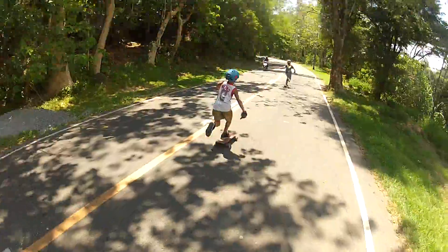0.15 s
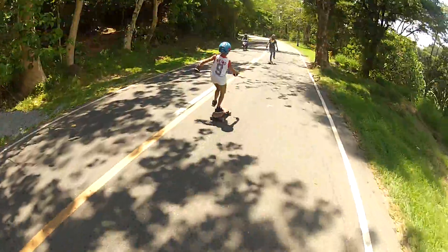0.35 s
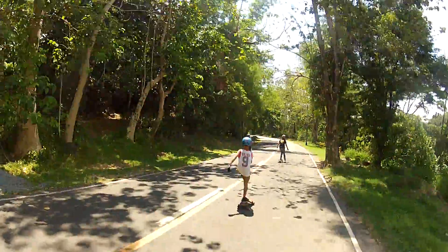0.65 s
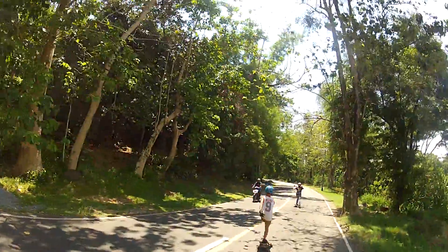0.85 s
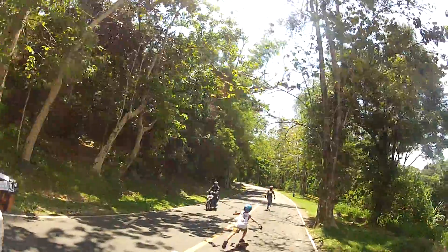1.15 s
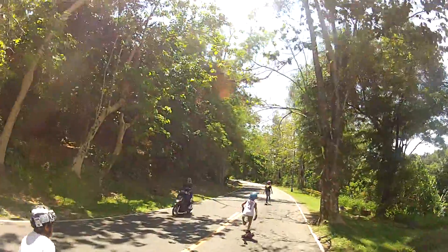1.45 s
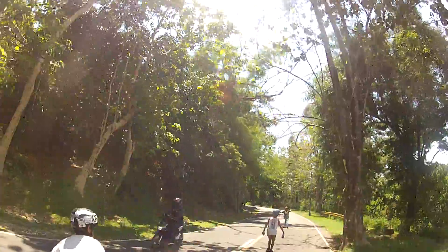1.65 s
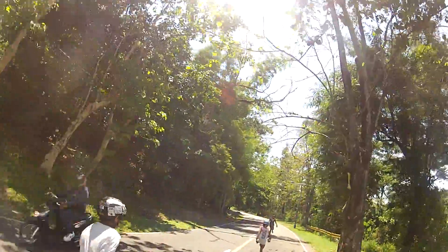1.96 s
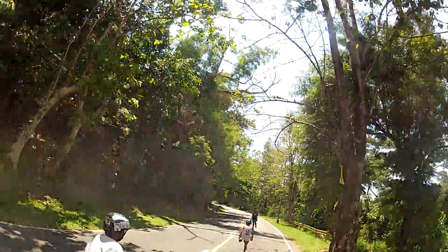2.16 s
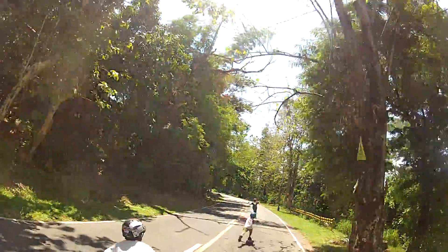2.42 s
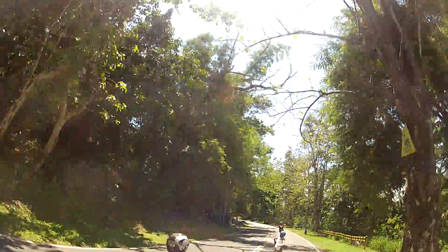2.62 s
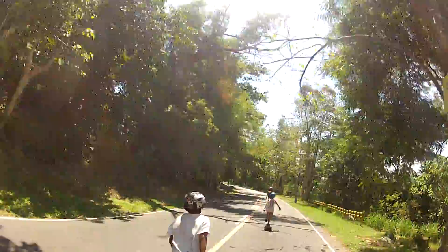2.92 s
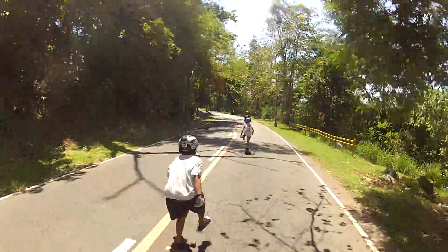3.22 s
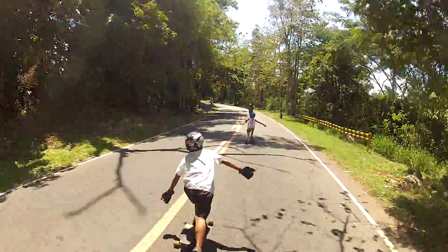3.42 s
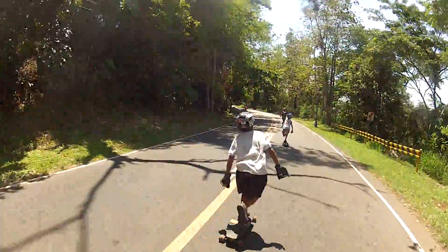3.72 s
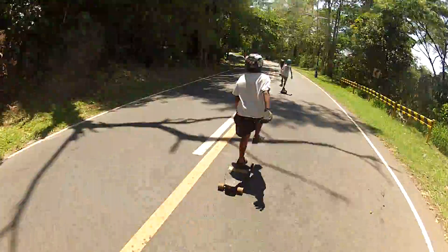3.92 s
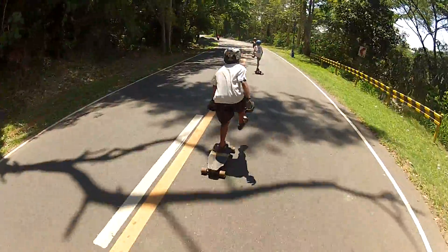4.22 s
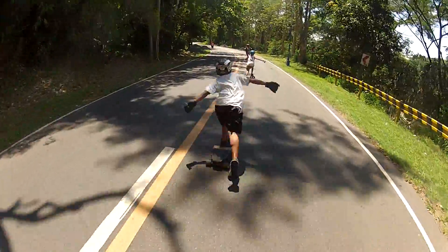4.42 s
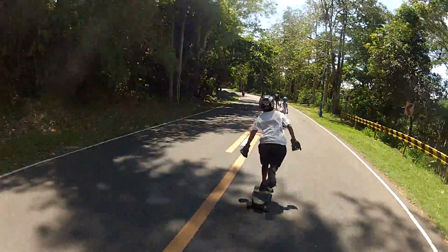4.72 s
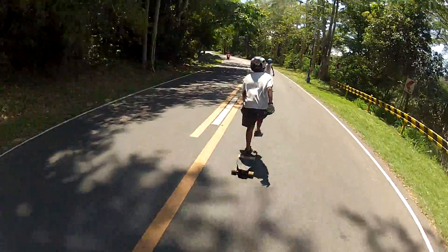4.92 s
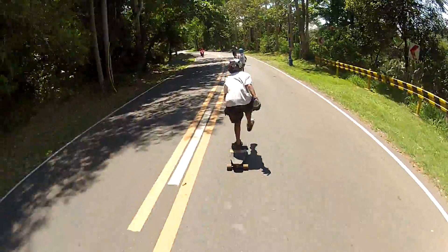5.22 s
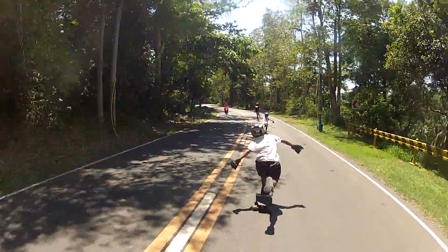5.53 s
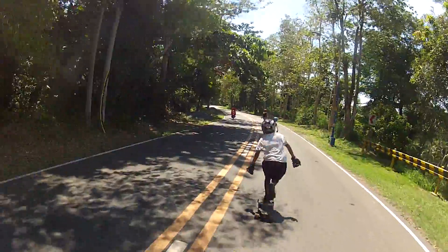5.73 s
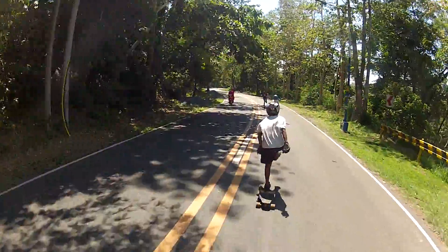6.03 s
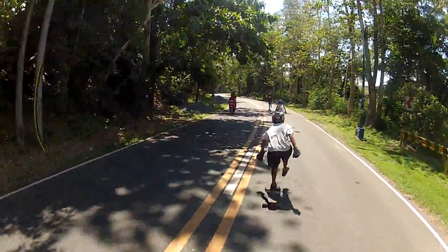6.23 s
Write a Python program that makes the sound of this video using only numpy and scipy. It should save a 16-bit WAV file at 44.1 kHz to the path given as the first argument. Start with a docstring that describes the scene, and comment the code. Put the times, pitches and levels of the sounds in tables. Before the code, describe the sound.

Longboard wheels grind and ring over coarse asphalt, heard from an action camera in a plastic case carried by a rider. Small clacks and ticks pepper the rolling. A hard knock comes early, a motorcycle hisses past, and a wheel squeals briefly. The rolling grows stronger, then two more heavy knocks and low wind gusts lead to another engine's thrum.

```python
"""Wheels grinding over rough asphalt come first, with small plastic clacks: longboards roll down a forest road.
We listen from an action camera in a plastic case, carried by one rider. Random stone hits ring the wheels and deck,
wind noise presses on the case, and bumps make the case and its mount rattle and knock.
A motorcycle hisses past after two seconds, a wheel squeals briefly, and another engine thrums up near the end.
The camera then turns overloads down, rounds off peaks and adds mirrored treble."""
import sys
import numpy as np
from scipy import signal
from scipy.fft import rfft, irfft
from scipy.io import wavfile
from scipy.ndimage import uniform_filter1d

SR = 44100
rng = np.random.default_rng(int(sys.argv[2]) if len(sys.argv) > 2 else 0)


def master_out(mix):
    """Clip the mix to full scale and print it as 16-bit PCM to the path in sys.argv[1]."""
    frames = np.transpose(np.atleast_2d(mix))
    ceiling = np.clip(frames, -1, 1)
    pcm = np.round(ceiling * 32767).astype(np.int16)
    wavfile.write(sys.argv[1], SR, pcm)


N = 280917

# The ride; its height above CRUISE_DB is the swell of the rolling noise: (time [s], level [dB])
RIDE = [(0.12, -57), (0.22, -59), (1.13, -55.5), (1.6, -51), (2.09, -54), (2.35, -47), (2.52, -47.5),
        (2.89, -51), (3.38, -48.5), (3.81, -48), (4.07, -53), (4.37, -50.5), (4.56, -47.5), (4.79, -48),
        (5.31, -50.5), (5.6, -44.5), (6.09, -48), (6.37, -46)]
CRUISE_DB = -50
# Layer levels when the swell is zero, before their flutter
WHEEL_DB, RUMBLE_DB, HISS_DB = -49.5, -50.5, -62
# Share of the swell that rumble and hiss follow; the rumble also grows as the board gathers speed
RUMBLE_FOLLOWS, HISS_FOLLOWS, RUMBLE_DB_PER_S = 0.229, 0.14, 1.0711
# Resonances of wheels and deck: (pitch [Hz], width [Hz], relative level [dB])
WHEEL_MODES = [(1163.2, 47.5, 0.5), (1712, 87.5, -1), (1903, 114, -10), (2343.4, 32, 0)]
# Tone outlines of the wheel grind, the low rumble and the contact hiss: (frequency [Hz], relative level [dB])
ROLL_TONE = [(450, -0.5), (520, -7), (620, -2.5), (880, -5.5), (1020, -4), (1150, 4.5), (1300, 3.5),
             (1500, -5.5), (1900, 6), (2130, 0), (2350, 7), (2600, -6), (2900, -11.5), (3400, -11)]
RUMBLE_TONE = [(29, -47.5), (50, -1), (72, 2.5), (103, -7.5), (134, -3), (167, -8.5), (257, -8.5),
               (316, -16.5), (578, -16), (800, -29), (1040, -63.5), (1760, -120)]
HISS_TONE = [(1500, -5.5), (2500, 12.5), (3300, 5), (4200, -2), (5000, 0), (5800, -10.5)]

# Wheels singing under a sideways push:
# (start time [s], end time [s], start pitch [Hz], end pitch [Hz], level at the middle [dB])
SINGS = [(0.072, 0.463, 506, 530, -65), (0.478, 0.893, 553, 532.8, -59), (0.886, 1.45, 513, 540, -64.5),
         (2.002, 2.27, 2300, 2367, -53), (3.182, 3.401, 1160, 1100, -54), (3.598, 3.8, 1177, 1130, -57.5),
         (6.151, 6.379, 1206, 1150, -53.5)]
# Squeal of a drifting wheel; only overtones of the base pitch sound: (time [s], base pitch [Hz], level [dB])
SQUEAL = [(2.70, 424, -103), (2.72, 428.7, -41), (2.76, 433.1, -49), (2.80, 448.2, -48), (2.86, 458.6, -55),
          (3.0, 468.5, -62), (3.12, 465.7, -63), (3.25, 466, -82.5)]
# Resonances of the squealing wheel: (pitch [Hz], half width [Hz], relative level [dB])
SQUEAL_MODES = [(2583, 48, -1.5), (3290, 293, -1.5)]

# Hard knocks of the mount: (time [s], level [dB], brightness [dB per octave], chatter length [s],
# thump relative to level [dB], lingering ring relative to level [dB])
KNOCKS = [(1.7223, -2.5, -5, 0.00235, -12.5, -32), (5.1258, 2, -7.5, 0.0035, -8, -40.5),
          (5.655, -0.5, -4.5, 0.00332, -8.5, -27)]
# Resonances of the plastic case, before each knock's brightness: (pitch [Hz], width [Hz], relative level [dB])
CASE_MODES = [(660, 245, -23.5), (1088.5, 121, -1.5), (1269, 98, -7), (1609, 67, -11), (1656, 260, 3.5),
              (1977.3, 121.6, 7), (2521, 127.6, -1), (2784, 320, -7), (3137, 123, -13.5), (4630, 300, -30),
              (5060, 336, -22.5)]
# Bumps that rattle the case; all thuds get a shared boost on top of their weight:
# (time [s], clack level [dB], thud weight relative to clack [dB], tick relative to clack [dB])
RATTLES = [(0.032, -44, -14, -29), (.065, -45.5, -19, -24.5), (.082, -48.5, 1, -17),
           (0.5001, -43, -10.5, -8), (0.5304, -39, 3, -12.5), (0.5927, -42, -6.5, -11.5),
           (0.7152, -43.5, -1.5, -13), (.963, -49, -12, -19), (1.1194, -29.5, -18.5, -9),
           (1.212, -42.5, -18, -13.5), (1.3123, -40.5, 1.5, -17), (1.4535, -41.5, -17, -6.5),
           (1.555, -39, 3.5, -18.5), (1.653, -31, -0.5, -10.5), (2.3862, -32.5, -15.5, -4.5),
           (2.411, -38, -22, -12.5), (3.1818, -40, 3, -13), (3.391, -31, -13.5, -15),
           (3.437, -38, -5, -0.5), (3.61, -38, 10.5, -18.5), (4.138, -50.5, 14.5, -23.5),
           (4.393, -28, -23.5, -17.5), (4.456, -42.5, 2, -4.5), (4.62, -45, 5, -9.5), (4.655, -47.5, 4, 3),
           (4.781, -40.5, -5.5, -13.5), (5.071, -42, 3.5, -12.5), (5.1061, -25.5, -2, -15.5),
           (5.378, -36, 7, -15), (5.3874, -39, 7.5, -0.5), (5.411, -49, 13, -5), (5.4848, -38, -0.5, -11)]
# Light ticks of a loose fitting: (time [s], level [dB])
TICKS = [(0.1123, -46), (0.261, -56), (0.6952, -50), (0.865, -51.5), (.9196, -57.5), (1.579, -47.5),
         (1.6932, -45), (2.5495, -50), (2.6212, -49), (2.6486, -51.5), (3.7109, -44), (4.8296, -49.5),
         (5.5799, -45.5), (5.6305, -42.5), (5.704, -41.5), (5.7983, -43)]
# Faint extra ticks of the fitting at random times: how many, middle level, spread either way
CHATTER_PER_S, CHATTER_DB, CHATTER_SPREAD_DB = 5.8, -61, 2
# Tone outlines of thud, clack (before its pitch is scaled) and tick: (frequency [Hz], relative level [dB])
THUD_TONE = [(50, -6.5), (110, -0.5), (270, 3), (420, -10.5), (750, -18.5), (1600, -13)]
CLACK_TONE = [(400, -23.5), (850, -24.5), (1180, -3), (1500, -10.5), (1900, 2), (2350, 3.5), (2900, -8.5),
              (3800, -52)]
TICK_TONE = [(2200, -41), (3000, 4), (3600, 11.5), (4300, 1), (5100, 6), (5800, -6.5)]
# Time for each scrape to die away by 60 dB
THUD_T60_S, CLACK_T60_S, TICK_T60_S = 0.0596, 0.0323, 0.0281
# Lighter bumps ring higher: pitch factor at a weight of 0 dB, and its rise for each dB less
CLACK_PITCH, CLACK_OCTAVES_PER_DB = 0.9735, 0.0158
# Jolts that set the mount swaying: (time [s], starting strength [dB])
JOLTS = [(0.529, -34), (1.659, -29), (1.722, -16), (4.648, -26), (5.11, -12.5), (5.152, -16.5),
         (5.362, -17), (5.393, -18.5), (5.663, -11.5), (5.731, -19)]
SWAY_T60_S = 0.1887

# Passing motorcycle: when it is nearest, how long it takes to come and to go, its tyre level there
PASS_S, APPROACH_S, RECEDE_S, TYRE_DB = 2.42, 0.264, 0.38, -49.5
# Its engine level and firing rate when nearest, and the steady fall in rate (Doppler)
BIKE_DB, BIKE_HZ, BIKE_FALL_HZ_PER_S = -54, 43.04, 4.1
# Oncoming motorcycle: (time [s], firing rate [Hz], level [dB])
ONCOMING_BIKE = [(5.3, 35.48, -53.5), (5.7, 35.74, -44.5), (6.0, 35.94, -45.5), (6.2, 35.9, -43),
                 (6.37, 35.73, -43.5)]
# Silencer resonances: (pitch [Hz], width [Hz], relative level [dB])
SILENCER = [(70, 19, -18), (159.5, 54, 0), (384, 40, -32)]

# Steady buffeting, its growth with speed, and the rise and fall times that all gusts share
BREEZE_DB, BREEZE_DB_PER_S, GUST_RISE_S, GUST_FALL_S = -58.5, 0.56, 0.0468, 0.0303
# Gusts added to the steady buffeting: (time [s], peak level [dB])
GUSTS = [(.11, -49), (.74, -38.5), (2.63, -46.5), (2.73, -37.5), (3.93, -46.5), (4.58, -40), (4.69, -36.5),
         (5.0, -44), (5.38, -38.5), (5.54, -31), (5.67, -32.5)]
# Tone outline of the wind on the case: (frequency [Hz], relative level [dB])
BUFFET_TONE = [(12, -30), (25, 5), (45, -3.5), (65, -1), (90, -22.5), (150, -40.5), (400, -27.5)]

# Camera gain control: overload threshold, share of the excess taken off, recovery, attack
CEILING_DB, DUCK_SHARE, RECOVER_DB_PER_S, DUCK_ATTACK_S = -3.5, 0.79, 95, 0.00665
# Camera treble: rate of the held steps, top of the plain sound, top of the mirrored sound
HOLD_HZ, BAND_HZ, TOP_HZ = 12000, 5900, 15500


def undb(db):
    """Turn decibels into a plain gain."""
    return 10 ** (np.asarray(db) / 20)


def unit(x):
    """Scale to an average strength (rms) of one."""
    return x / np.sqrt(np.mean(x ** 2) + 1e-20)


def curves(table):
    """Join the points of a table by straight lines, one curve for each column after the time."""
    s, *columns = np.transpose(table)
    return [np.interp(np.arange(N) / SR, s, c) for c in columns]


def add(out, s, x):
    """Mix a short sound in at time s."""
    i = max(int(s * SR), 0)
    out[i:i + len(x)] += x[:max(N - i, 0)]


def colour(x, points, size=4096):
    """Filter to a tone outline with steep skirts; the filter never answers before its input."""
    hz, db = np.transpose(points)
    octave = np.log2(np.maximum(np.arange(size // 2 + 1) * SR / size, 2))
    below = np.maximum(np.log2(hz[0]) - octave, 0)
    above = np.maximum(octave - np.log2(hz[-1]), 0)
    skirt_db = np.minimum(24 * (below + above), 60)
    gain = undb(np.interp(octave, np.log2(hz), db) - skirt_db)
    # folding the cepstrum gives the minimum-phase filter with this gain
    cepstrum = irfft(np.log(gain))
    cepstrum[1:size // 2] *= 2
    cepstrum[size // 2 + 1:] = 0
    response = irfft(np.exp(rfft(cepstrum)))
    return signal.fftconvolve(x, response)[:len(x)]


def resonate(x, hz, width_hz):
    """Ring one resonance, with a gain of one at its centre."""
    return signal.lfilter(*signal.iirpeak(hz, hz / width_hz, fs=SR), x)


def walk(rate):
    """Wander smoothly at random, with a spread near one."""
    k = max(int(SR / rate), 1)
    steps = rng.standard_normal(2048)[np.arange(N) // k % 2048]
    smooth = uniform_filter1d(uniform_filter1d(steps, k), k)
    return 1.3 * smooth


def burst(t, t60, points, blow=0):
    """A short scrape, with a sharp blow if wanted, coloured by what it shakes."""
    envelope = (1 - np.exp(-t / .0007)) * undb(-60 * t / max(t60, .003))
    scrape = rng.standard_normal(len(t)) * envelope
    contact = blow * signal.unit_impulse(len(t)) + scrape / np.linalg.norm(scrape)
    x = colour(contact, points)
    # same energy as 10 ms at an rms of one
    return x / np.sqrt(np.sum(x ** 2) / (.01 * SR))


def rolling():
    """The road grain rings wheels and deck, rumbles up through the rider and hisses where the tyres touch."""
    swell_db = curves(RIDE)[0] - CRUISE_DB
    rumble_db = RUMBLE_DB + RUMBLE_FOLLOWS * swell_db + RUMBLE_DB_PER_S * np.arange(N) / SR

    grind = unit(colour(grit(rate=4000, spread_db=2.0), ROLL_TONE))
    flutter_db = 1.15 * walk(28)
    wheels = (grind + undb(-7.0) * wheel_rings()) * undb(WHEEL_DB + swell_db + flutter_db)

    rumble = unit(colour(grit(rate=3300, spread_db=2.0), RUMBLE_TONE))
    rumble = rumble * undb(rumble_db + 0.17 * walk(22))

    # the motorcycle's tyres radiate sideways, so they fade faster than its engine
    bike_tyres = undb(TYRE_DB) * nearness() ** 2
    hiss_gain = np.hypot(undb(HISS_DB + HISS_FOLLOWS * swell_db), bike_tyres)
    hiss = unit(colour(grit(rate=9800, spread_db=3.0), HISS_TONE)) * hiss_gain * undb(.5 * walk(35))
    return wheels + rumble + road_echo(hiss, share=0.3)


def grit(rate, spread_db):
    """Asphalt stones meet the wheels: dense random hits (rate per second), a few much harder than the rest."""
    hits = rng.random(N) < rate / SR
    hardness_db = spread_db * np.minimum(rng.exponential(size=N), 5)
    return unit(hits * rng.standard_normal(N) * undb(hardness_db))


def wheel_rings():
    """Each resonance of wheels and deck swells and fades as the weight shifts."""
    out = 0
    for hz, width, db in WHEEL_MODES:
        stones = grit(rate=5000, spread_db=3)
        out = out + undb(db + 1.38 * walk(3.2)) * resonate(stones, hz, width)
    return unit(out)


def road_echo(x, share):
    """Hiss also arrives off the road around the pass; its shrinking delay sweeps a row of notches through it."""
    i = np.arange(N)
    lag_s = np.interp(i / SR, [2.0, 2.7], [.00173, .00158])
    depth = share * np.exp(-((i / SR - 2.3) / 0.7) ** 2)
    echo = np.interp(i - lag_s * SR, i, x)
    return (x + depth * echo) / np.sqrt(1 + depth ** 2)


def singing():
    """A wheel pushed sideways rings at one narrow, drifting, uneven pitch."""
    out, t = 0, np.arange(N) / SR
    for start, end, start_hz, end_hz, db in SINGS:
        progress = np.clip((t - start) / (end - start), 0, 1)
        phase = 2 * np.pi * np.cumsum(start_hz + (end_hz - start_hz) * progress) / SR
        ring = (0.125 + .5 * walk(70)) * np.sin(phase) + .5 * walk(70) * np.cos(phase)
        fade = np.sqrt(4 * progress * (1 - progress))
        out = out + unit(ring) * undb(db) * fade
    return out


def squeal(rough):
    """Urethane sticks and slips unevenly; overtones near the wheel's resonances stand out."""
    hz, db = curves(SQUEAL)
    phase = 2 * np.pi * np.cumsum(hz) / SR
    tone = 0
    for k in np.arange(6, 11):
        gain = 0
        for mode_hz, half_width, mode_db in SQUEAL_MODES:
            gain = gain + undb(mode_db) / np.hypot(1, (k * hz - mode_hz) / half_width)
        tone = tone + gain * np.sin(k * phase + rough * walk(190)) * undb(2 * walk(50))
    return unit(tone) * undb(db)


def knocks(chatter_db, tail_db, tail_t60, metal_hz, metal_t60):
    """The mount thumps its stop and chatters for a few ms; the case rings hard and a thin tone lingers."""
    out, t = np.zeros(N), np.arange(SR // 3) / SR
    for s, level_db, bright_db, chatter_s, thump_db, metal_db in KNOCKS:
        pressure = np.exp(-(t / chatter_s) ** 4) + undb(tail_db - 60 * t / tail_t60)
        shell = 0
        for k, (hz, width, db) in enumerate(CASE_MODES):
            # every mode feels the first blow, then its own share of the chatter
            chatter = rng.standard_normal(len(t)) * pressure
            chatter = undb(chatter_db) * chatter / np.linalg.norm(chatter)
            contact = (-1) ** k * signal.unit_impulse(len(t)) + chatter
            mode_gain = undb(db + bright_db * np.log2(hz / 1500))
            shell = shell + mode_gain * unit(resonate(contact, hz, width))
        # same energy as 4 ms at an rms of one
        shell = shell / np.sqrt(np.sum(shell ** 2) / (.004 * SR))
        thump = undb(thump_db) * burst(t, 0.0219, THUD_TONE, blow=0.825)
        metal_phase = 2 * np.pi * metal_hz * t + 1.72 * walk(151)[:len(t)]
        metal = np.sin(metal_phase) * undb(metal_db - 60 * t / metal_t60)
        add(out, s, undb(level_db) * (shell + thump + metal))
    return out


def rattles(thud_db):
    """Bumps shake the case into clacks, with thuds for weight and fine ticks; a loose fitting ticks too."""
    out, t = np.zeros(N), np.arange(4096) / SR
    for s, db, weight_db, edge_db in RATTLES:
        pitch = CLACK_PITCH * 2 ** (-CLACK_OCTAVES_PER_DB * weight_db)
        clack_tone = [(hz * pitch, gain_db) for hz, gain_db in CLACK_TONE]
        add(out, s, undb(db + weight_db + thud_db) * burst(t, THUD_T60_S, THUD_TONE, blow=0.827))
        add(out, s, undb(db) * burst(t, CLACK_T60_S, clack_tone))
        add(out, s, undb(db + edge_db) * burst(t, TICK_T60_S, TICK_TONE))
    faint = []
    for u, v in rng.random((int(CHATTER_PER_S * N / SR), 2)):
        faint.append((u * N / SR, CHATTER_DB + CHATTER_SPREAD_DB * (2 * v - 1)))
    for s, db in list(TICKS) + faint:
        add(out, s, undb(db) * burst(t, TICK_T60_S, TICK_TONE))
    return out


def sway(mount_hz):
    """After a jolt the camera swings on its mount, a low dying boom."""
    out, t = np.zeros(N), np.arange(SR // 2) / SR
    for s, db in JOLTS:
        envelope = (1 - np.exp(-t / 0.00296)) * undb(db - 60 * t / SWAY_T60_S)
        add(out, s, np.sin(2 * np.pi * mount_hz * t) * envelope)
    return out


def motorcycles():
    """One engine swells as it goes by while its pitch falls steadily; a second comes up near the end."""
    t = np.arange(N) / SR
    passing_hz = BIKE_HZ - BIKE_FALL_HZ_PER_S * (t - PASS_S)
    passing = engine(passing_hz, pipe_hz=221, pipe_width_hz=197, scatter_db=5.0)
    hz, db = curves(ONCOMING_BIKE)
    start = ONCOMING_BIKE[0][0]
    fade_in = np.interp(t, [start - .5, start], [0, 1])
    oncoming = engine(hz, pipe_hz=219.7, pipe_width_hz=44, scatter_db=1.5) * fade_in
    return passing * undb(BIKE_DB) * nearness() + oncoming * undb(db)


def engine(hz, pipe_hz, pipe_width_hz, scatter_db):
    """A single cylinder: one pulse a firing, ringing the exhaust pipe and the silencer."""
    firings = np.floor(np.cumsum(hz * (1 + 0.001697 * walk(20))) / SR)
    pulses = np.diff(firings, prepend=0) * undb(scatter_db * walk(40))
    exhaust = resonate(pulses, pipe_hz, pipe_width_hz)
    for mode_hz, width, mode_db in SILENCER:
        exhaust = exhaust + undb(mode_db) * resonate(pulses, mode_hz, width)
    return unit(signal.sosfilt(signal.butter(2, 620, fs=SR, output="sos"), exhaust))


def nearness():
    """Gain of the passing motorcycle: one when nearest, less with distance, fading slower than it came."""
    since = np.arange(N) / SR - PASS_S
    return 1 / np.hypot(1, since / np.where(since < 0, APPROACH_S, RECEDE_S))


def wind():
    """Swirling air presses on the case, harder with speed; gusts swell and drop in about a tenth of a second."""
    t = np.arange(N) / SR
    pressure = undb(BREEZE_DB + BREEZE_DB_PER_S * t + 3.0 * walk(12))
    for s, db in GUSTS:
        width_s = np.where(t < s, GUST_RISE_S, GUST_FALL_S)
        pressure = pressure + undb(db) * np.exp(-((t - s) / width_s) ** 2)
    return unit(colour(rng.standard_normal(N), BUFFET_TONE)) * pressure


def scene():
    """Mix road, air and engines with the noises of the case on top."""
    road = rolling() + singing() + squeal(rough=1.1) + motorcycles() + wind()
    case = knocks(chatter_db=-4, tail_db=-33, tail_t60=0.05, metal_hz=1284, metal_t60=0.287)
    case = case + rattles(thud_db=1.5) + sway(mount_hz=64.78)
    return (road + case)[None, :]


def ducking(x):
    """Gain that drops on an overload, too late for the first few ms of a knock, and recovers steadily."""
    recovery_db = RECOVER_DB_PER_S * np.arange(N) / SR
    level_db = 20 * np.log10(np.abs(x) + 1e-9)
    excess_db = DUCK_SHARE * np.maximum(level_db - CEILING_DB, 0)
    # the running maximum remembers each overload while its effect drains away
    duck_db = np.maximum.accumulate(excess_db + recovery_db) - recovery_db
    pole = np.exp(-1 / (DUCK_ATTACK_S * SR))
    return undb(-signal.lfilter([1 - pole], [1, -pole], duck_db))


def record(dry):
    """The camera ducks overloads, rounds off peaks and holds each sample, which mirrors sound into the treble."""
    x = .85 * np.tanh(dry[0] * ducking(dry[0]) / .85)
    x = signal.sosfilt(signal.ellip(8, .3, 60, BAND_HZ, fs=SR, output="sos"), x)
    # the steps of a held signal are as tall as its slope, so the mirror images follow the slope
    steps = np.diff(x, prepend=0) * 2 * np.cos(2 * np.pi * HOLD_HZ * np.arange(N) / SR)
    x = x + signal.lfilter([1], [1, -.95], steps)
    return signal.sosfilt(signal.ellip(8, .2, 70, TOP_HZ, fs=SR, output="sos"), x)[None, :]


dry = scene()
out = record(dry)
master_out(out)
```